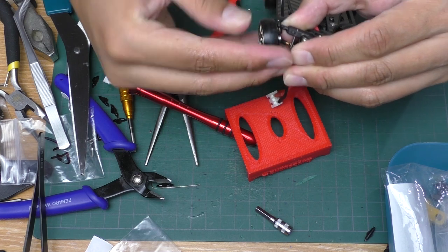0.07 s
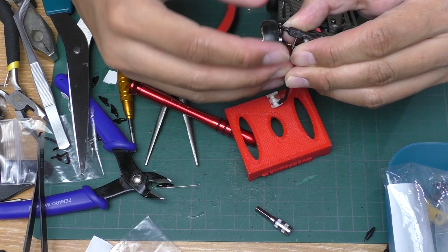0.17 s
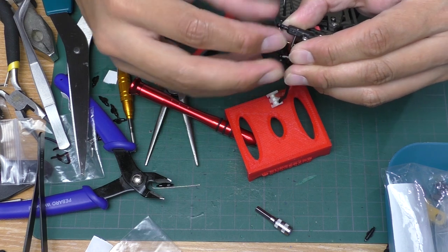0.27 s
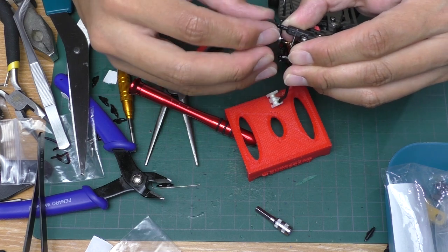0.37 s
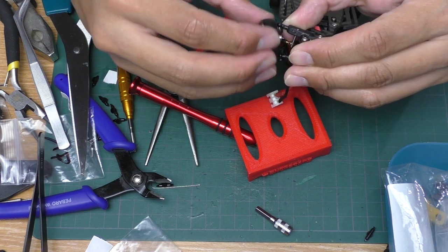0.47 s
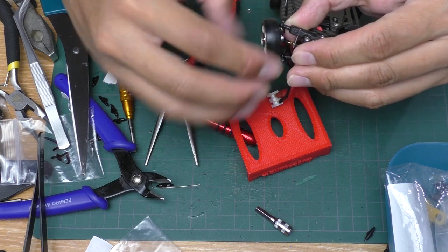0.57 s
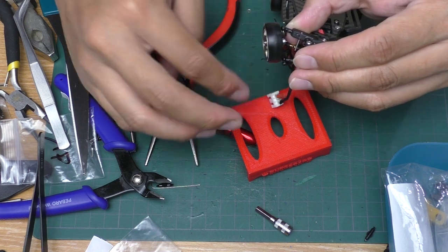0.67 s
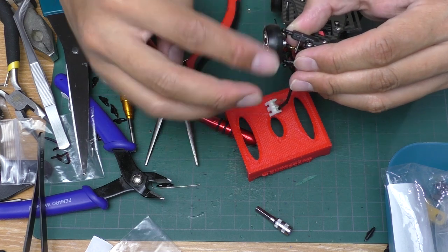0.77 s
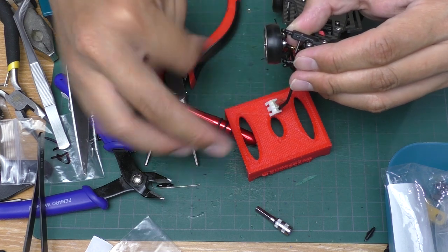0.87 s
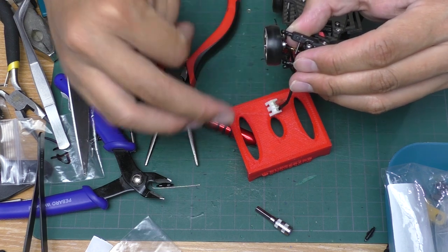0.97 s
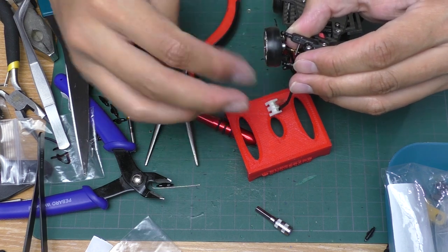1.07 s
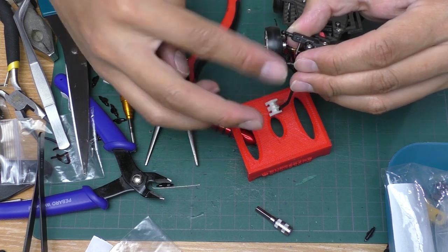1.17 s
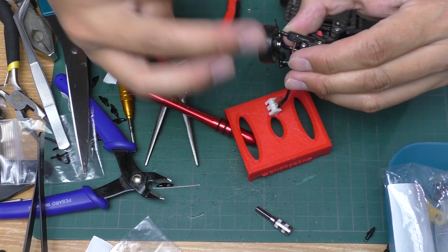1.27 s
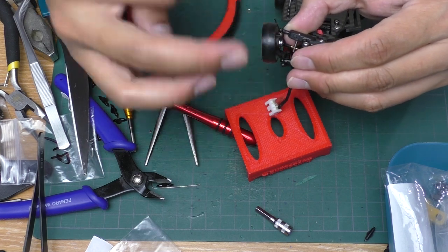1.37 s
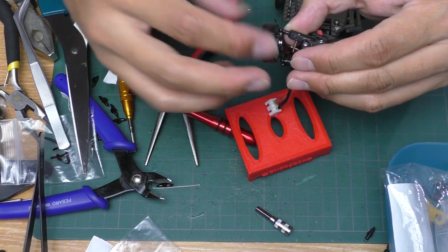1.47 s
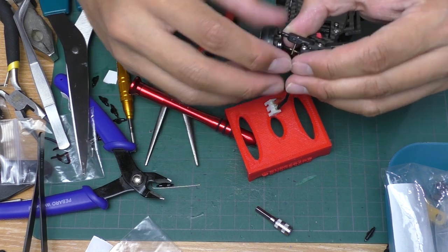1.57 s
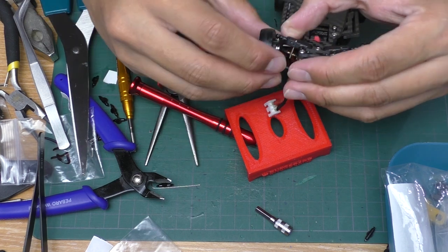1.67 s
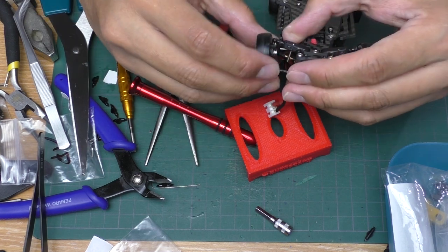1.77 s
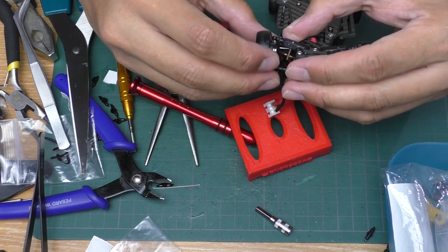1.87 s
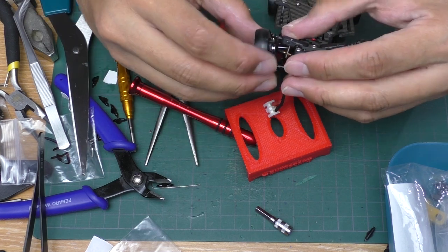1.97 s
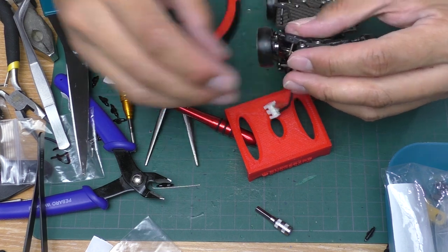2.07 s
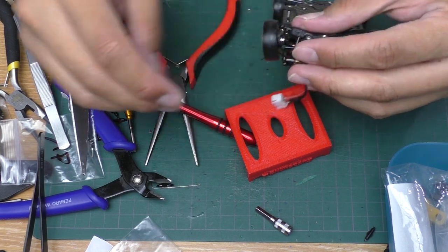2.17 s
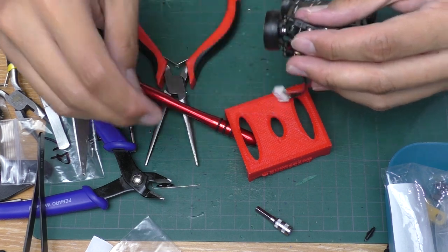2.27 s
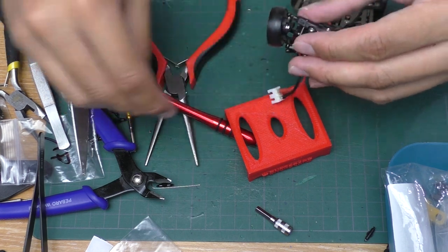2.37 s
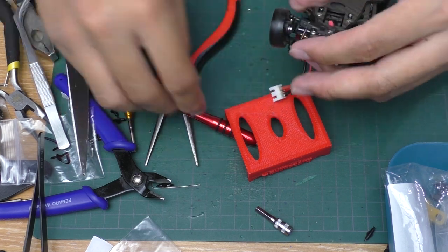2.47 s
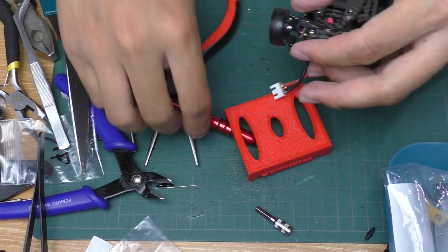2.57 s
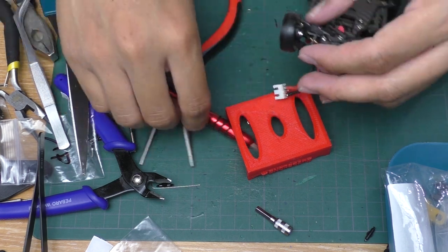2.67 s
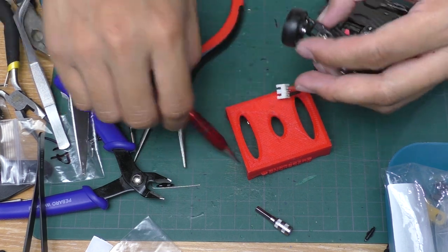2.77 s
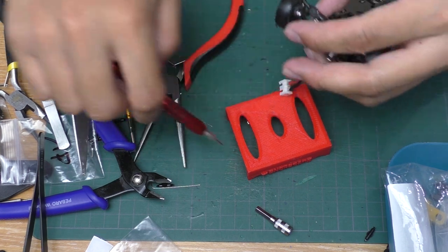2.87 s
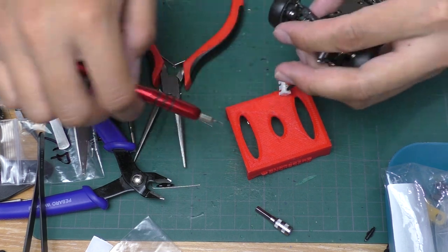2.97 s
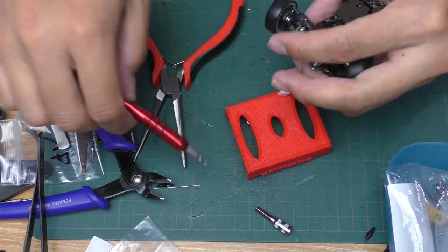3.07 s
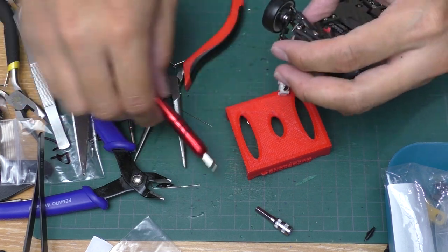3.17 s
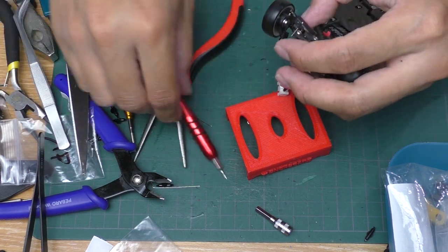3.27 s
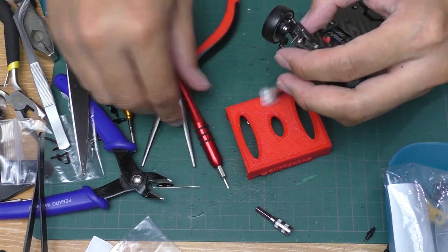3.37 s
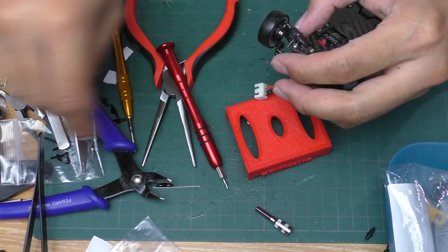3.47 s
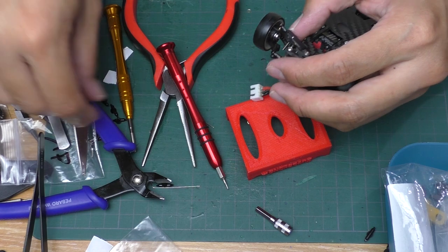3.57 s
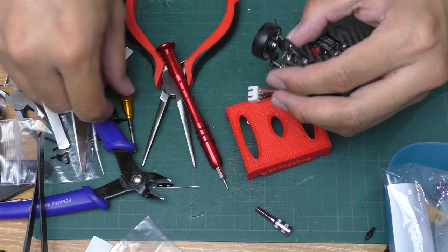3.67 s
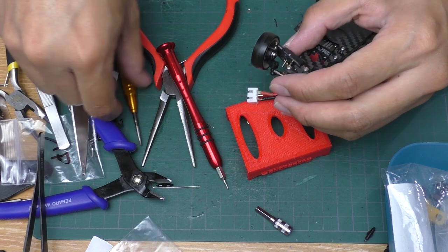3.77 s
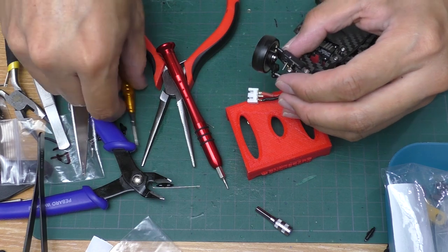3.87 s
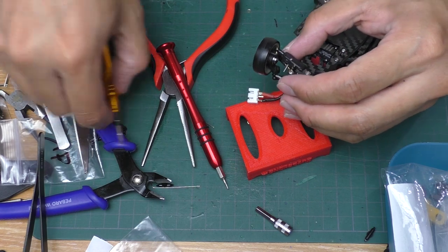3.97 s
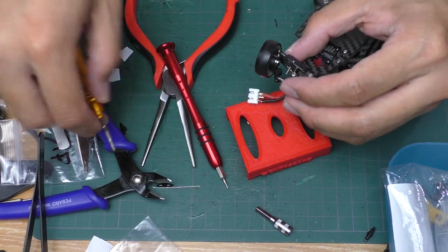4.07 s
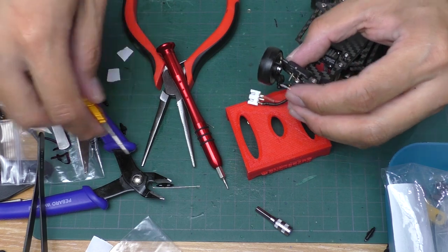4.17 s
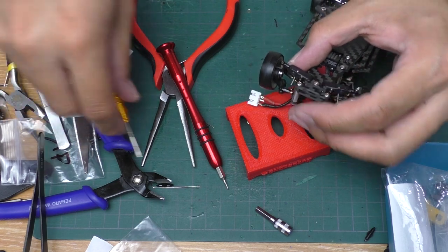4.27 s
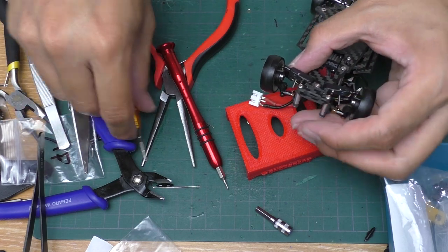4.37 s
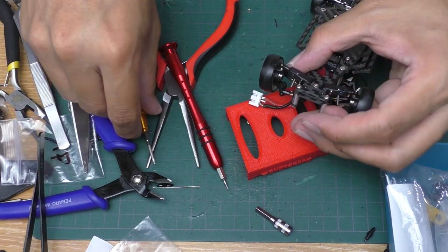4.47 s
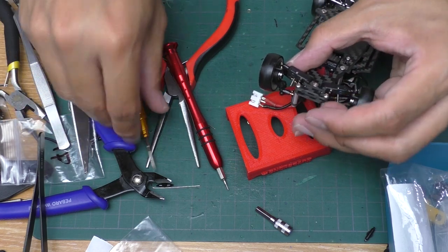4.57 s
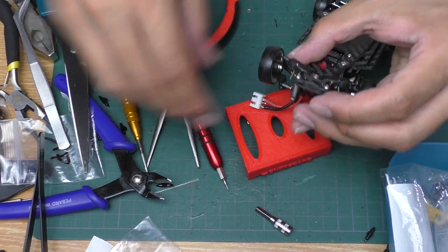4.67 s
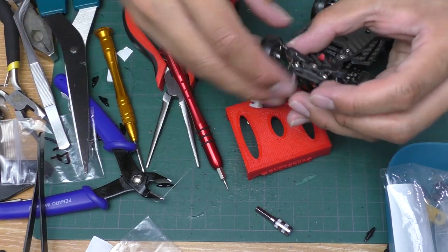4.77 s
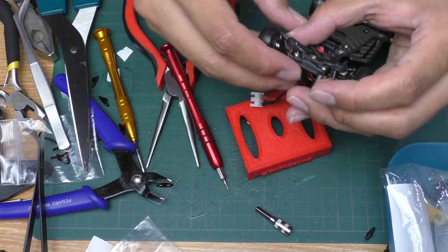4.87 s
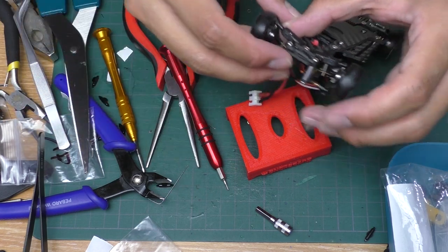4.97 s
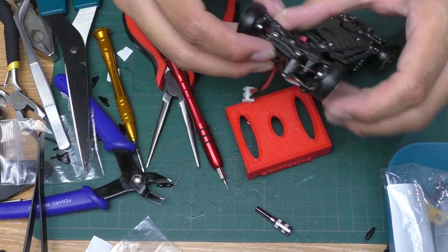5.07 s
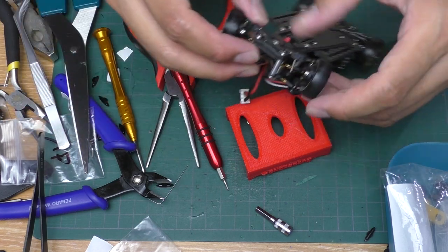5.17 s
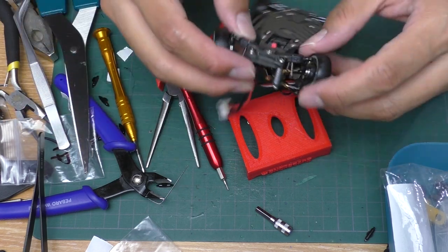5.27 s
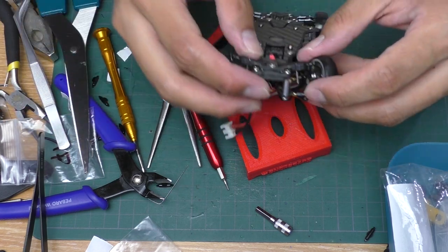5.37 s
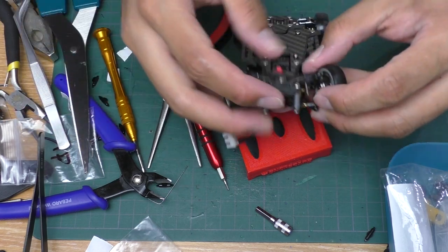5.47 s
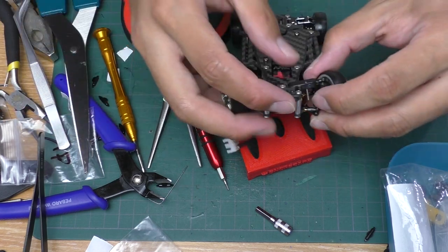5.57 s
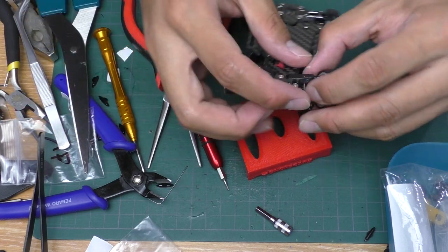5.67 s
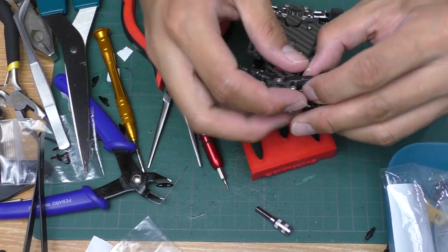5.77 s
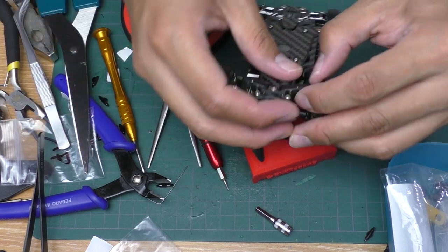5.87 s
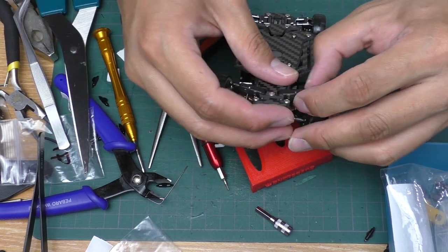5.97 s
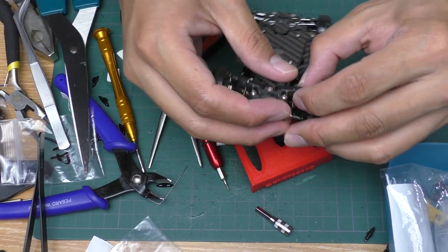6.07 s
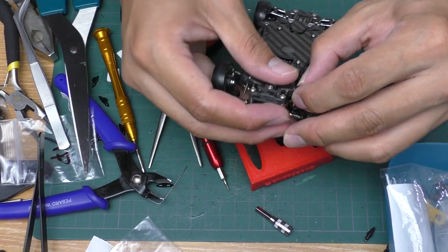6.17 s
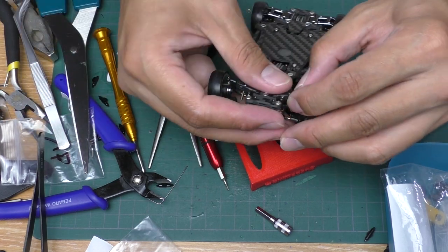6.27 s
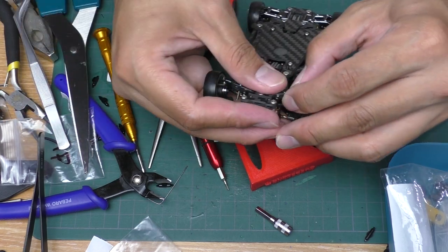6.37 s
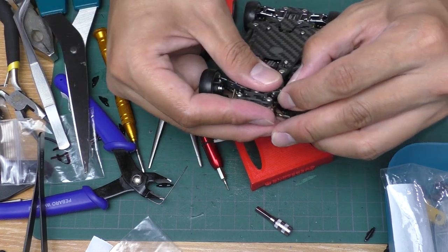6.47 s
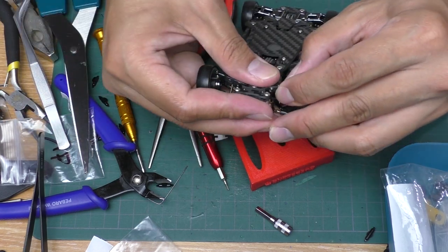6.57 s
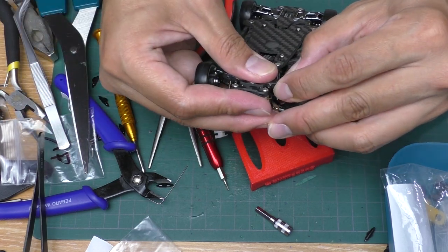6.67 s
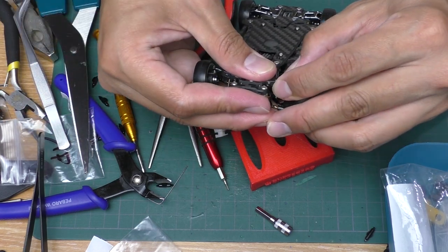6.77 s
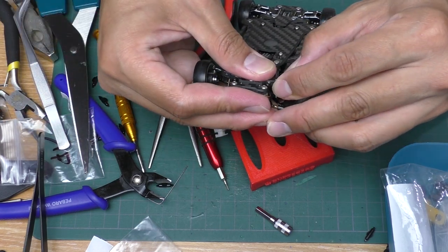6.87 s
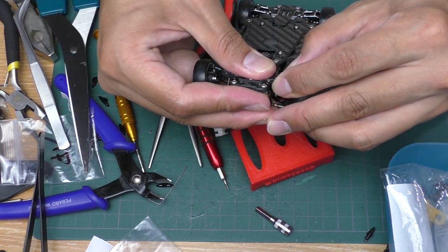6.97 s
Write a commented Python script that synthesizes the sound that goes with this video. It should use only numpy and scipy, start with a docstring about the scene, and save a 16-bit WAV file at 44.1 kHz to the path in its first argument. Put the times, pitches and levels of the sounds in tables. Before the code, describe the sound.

Close stereo pickup of hands handling a small plastic model in a quiet small room. Short joint creaks and dry ticks come first; then a metal tool strikes pliers with a brief ring, and screwdrivers are laid down left of centre with hard bench knocks and high steely clinks. Afterwards come soft finger rubbing, more squeaky creaks and fine snaps, fading to near silence.

```python
"""Plastic model on the workbench

In a quiet small room, hands work on a small plastic model car over a cutting mat on a wooden bench,
close to a stereo pair. Its joints creak as unsteady sine modes, small parts tick as bursts of resonance.
Fingers rub over it: swelling strokes of coloured noise and tiny slips. To the left, two metal screwdrivers
are picked up and laid down: resonant knocks on the bench and decaying clinks against other tools.
Beneath lie the rustle of the hands and the room's background, both coloured noise."""
import sys
import numpy as np
from scipy import signal
from scipy.fft import rfft, irfft
from scipy.io import wavfile
from scipy.ndimage import uniform_filter1d

SR = 44100
rng = np.random.default_rng(int(sys.argv[2]) if len(sys.argv) > 2 else 0)


def unload_wav(signal):
    """Save mono or channel-first audio to the path in sys.argv[1] as 16-bit WAV at rate SR, clipped to [-1, 1]."""
    wavfile.write(
        sys.argv[1],
        SR,
        np.round(np.clip(np.atleast_2d(signal).T, -1, 1) * 32767).astype(np.int16),
    )


N = 310464
TIME = np.arange(N) / SR
HIT_TIME = np.arange(SR // 4) / SR
ATTACK_S = 0.012  # a strike's level is judged over this opening

# Levels in the event tables are relative: trims and filters further on still act on them.
# Colour of the room's background: centre_hz, density_db (dB per Hz)
BACKGROUND_COLOUR = [(15, -33), (25, -4.5), (102, -2), (127, -5.5), (236, -13.5), (285, -3), (384, -32.5),
                     (489, -9), (641, -32), (714, -20), (840, -32), (1020, -15), (4870, -42.5),
                     (14000, -29.5), (16000, -40.5)]
BACKGROUND_DB = -68
# Decay of the room's reverberation: centre_hz, t60_s
ROOM_DECAY = [(100, 0.54), (400, 0.42), (1500, 0.75), (3000, .5), (6000, 0.37), (14000, 0.29)]
# Energy of the reverberation against the direct sound: centre_hz, level_db
ROOM_LEVEL = [(100, 4.5), (300, 0), (700, -2), (1500, -1), (3000, -7.5), (6000, -5.5), (10000, -9.5),
              (15000, -21)]
# Left-right likeness of diffuse sound: centre_hz, likeness (0-1)
STEREO_LIKENESS = [(40, .8), (300, 0.9), (1400, 0.7), (4000, 0.64), (14000, 0.85)]
# Colour of hands shifting: centre_hz, density_db (dB per Hz)
SHIFT_COLOUR = [(50, -10.5), (110, 0.5), (280, 1.5), (480, -10), (700, -18), (1500, -11.5), (2700, -14.5),
                (4500, -27.5), (8000, -33.5), (15000, -29)]
# Low rustle of hands shifting their grip: time_s, level_db
GRIP_LEVEL = [(0.0, -64.5), (1.82, -67), (2.65, -55.5), (2.96, -66), (3.24, -66), (3.45, -60), (4.35, -64),
              (4.67, -62), (4.94, -59.5), (5.92, -58), (6.45, -68), (7.04, -71)]

# A hand bumps softly on the bench: start_s, level_db
HAND_BUMPS = [(1.299, -62.5), (2.403, -51), (2.427, -50.5), (2.721, -52.5), (5.788, -52)]
# Lowest modes of the bench: pitch_hz, width_hz, level_db
BENCH_MODES = [(108, 18, -0.53), (167, 83, -1.1), (264, 59, 0)]
# Metal tools shifting against each other: start_s, level_db
TOOL_NUDGES = [(3.783, -62.5), (5.9, -57.5), (6.126, -71), (6.203, -69)]
# The one blow on the pliers: start_s, level_db
PLIERS_BLOW = (2.7072, -33)
# Ringing of the pliers: pitch_hz, width_hz, level_db
PLIERS_MODES = [(1444, 91, -11.5), (2044, 43, -12), (2605, 52, 0), (2730, 360, -8), (3280, 250, -21),
                (3980, 110, -10.5), (4530, 67, -9.5), (6350, 98, -20), (6980, 37, -21), (10500, 230, -23)]
# The slim steel screwdriver clinks: start_s, first_mode_db, second_mode_db
SHAFT_CLINKS = [(3.845, -48.5, -61), (3.9937, -35.5, -43), (4.458, -36, -45.5), (4.496, -43.5, -57),
                (4.625, -39.5, -25), (4.646, -40, -36.5)]
# Its two bending modes, ringing freely: pitch_hz, t60_s
SHAFT_MODES = [(5297, 0.2), (11715, 0.15)]
# Tools knocking on the bench: start_s, clack_db, tilt_db_per_octave (hardness), thud_db, rebound_s (0: none)
BENCH_KNOCKS = [(1.296, -51.5, -7.5, -60.5, 0), (2.421, -52.5, 4, -52, 0), (2.664, -72, -16, -38, 0.00048),
                (2.684, -51.5, -4.5, -49, 0.000041), (3.2994, -37.5, 0.5, -45, 0),
                (3.423, -45, -5, -48.5, 0.00024), (3.429, -37.5, -4.5, -35.5, 0.019),
                (3.821, -53.5, -9, -51, 0.0042), (3.9958, -45, -1, -52, 0.00017),
                (4.4596, -30, -5.5, -42, 0.031), (4.626, -28.5, 5.5, -36, 0.021)]
# Hard contact between small parts: pitch_hz, width_hz, level_db
CONTACT_MODES = [(4106, 840, -1), (5260, 870, -13), (6500, 3000, -3), (8800, 1200, -1.5), (9700, 2000, -3),
                 (12200, 570, 2), (13500, 4500, 2), (13510, 1300, -4.5)]
# Screwdriver handle: pitch_hz, width_hz, level_db
HANDLE_MODES = [(2870, 470, -2.5), (3063, 150, -7), (3180, 70, -9)]
# Bench board: pitch_hz, width_hz, level_db
BOARD_MODES = [(954, 78, -7.5), (1136, 110, -0.5), (1376, 130, 3), (1520, 150, 5), (1760, 560, 0.5),
               (2114, 460, -0.5)]
# Deep thud of the board: pitch_hz, width_hz, level_db
THUD_MODES = [(110, 38, -13.5), (171, 60, -10.5), (211.6, 58, -4), (271.7, 27, 1.5), (310, 34, -6),
              (410, 28, -1), (473, 22, -3)]
# The crack against the clack at zero tilt, and the octaves of tilt that add to it
CRACK_DB, CRACK_OCTAVES = 3.5, 0.51
# The board against the clack, and how far it follows the thud instead (0-1)
BOARD_DB, BOARD_FOLLOWS = -0.5, 0.1
# What a rebound loses in its clack and in its thud
REBOUND_CLACK_LOSS_DB, REBOUND_THUD_LOSS_DB = 15.5, 9

# Fingers rubbing over plastic and tools: start_s, end_s, level_db
RUB_STROKES = [(2.316, 2.424, -50.5), (2.57, 2.634, -73), (2.717, 2.917, -53.5), (3.781, 3.904, -52),
               (5.048, 5.151, -64.5), (5.234, 5.419, -51), (5.474, 5.626, -58), (5.812, 5.89, -55.5),
               (5.943, 6.026, -43.5), (6.004, 6.298, -59.5)]
# Colour of the rubbing skin: centre_hz, density_db (dB per Hz)
RUB_COLOUR = [(60, -11), (120, -9.5), (300, 3.5), (480, -10.5), (700, -10), (1400, -1.5), (2200, -7),
              (3400, -8), (5200, -27.5), (8000, -42), (11000, -30), (15500, -58)]
# The hollow chassis, stirred by friction: pitch_hz, width_hz, level_db
SHELL_MODES = [(1436, 210, 1.5), (2120, 350, -5.5), (2565, 240, 2.5), (3310, 250, 1.5), (4267, 300, -8),
               (5120, 300, -7.5), (6500, 400, -14.5), (6970, 270, -10.5), (9970, 2300, -6),
               (13100, 3000, -7.5)]
# Small plastic parts snapping: start_s, level_db, tilt_db_per_octave
PLASTIC_TICKS = [(0.009, -50.5, -16), (0.283, -66.5, 0), (0.613, -65, 6), (0.778, -46.5, -9.5),
                 (0.887, -54.5, -1.5), (1.248, -54.5, -1), (1.3027, -45.5, 9), (1.336, -58.5, -18),
                 (1.647, -61.5, 8), (2.1, -64, 8), (2.204, -45.5, -9.5), (2.412, -50.5, -4),
                 (2.761, -64, -6), (2.806, -52.5, -19), (2.841, -61, -2), (3.318, -50, 6),
                 (3.958, -55.5, -5.5), (4.282, -66, -5), (4.953, -48, -7.5), (5.007, -60, -15),
                 (5.368, -48.5, -9.5), (5.419, -50, -5), (5.633, -47.5, -25), (5.79, -43.5, -33),
                 (5.803, -50.5, 20), (6.018, -52.5, -1)]
# Loose parts tick faintly at random, around a level this far from that of the grip
FAINT_TICKS_PER_S, FAINT_TICK_DB = 3.2, -16
# Joints of the chassis creak in runs: start_s, slips (count), lower_db, upper_db
JOINT_CREAKS = [(0.059, 1, -50, -60), (0.121, 1, -45.5, -57), (0.759, 1, -40.5, -54), (0.767, 3, -35, -45),
                (1.599, 1, -50.5, -46.5), (2.169, 2, -39.5, -36), (2.202, 4, -35, -38),
                (2.359, 2, -49, -40), (2.381, 1, -44, -45.5), (2.470, 2, -50, -47.5), (2.624, 1, -56, -45),
                (2.656, 1, -62, -49), (2.826, 2, -56, -42.5), (2.874, 2, -55, -45), (2.916, 1, -50.5, -50),
                (2.948, 1, -61, -50), (3.265, 1, -45, -45.5), (3.428, 1, -52, -30), (5.182, 1, -53, -45.5),
                (5.287, 2, -48, -42.5), (5.309, 4, -42.5, -39.5), (5.370, 2, -42.5, -49),
                (5.442, 2, -46.5, -49), (5.538, 3, -44.5, -47), (5.656, 2, -36, -44.5),
                (5.720, 1, -43.5, -52)]
# Lower resonance of the joints and its companions: pitch_hz, width_hz, level_db
LOWER_MODES = [(2629, 44, 0.5), (2235, 140, -41), (4960, 71, -19.5), (5980, 170, -23.5)]
# Upper resonance of the joints and its companions: pitch_hz, width_hz, level_db
UPPER_MODES = [(3377, 64, 16), (3040, 180, 10), (4370, 250, -29), (6900, 180, -31)]
# Slips come at a nearly steady pace; one of SLIP_DB holds for SLIP_S, twice as long per SLIP_DOUBLES_DB more
SLIP_GAP_S, SLIP_S, SLIP_DB, SLIP_DOUBLES_DB = 0.011, 0.0036, -46, 7.5
# A run's strongest place (share of the run), and the loss half a run away from there
RUN_PEAK, RUN_ARCH_DB = 0.42, 8


def from_db(db):
    """Decibels to gain."""
    return 10 ** (np.asarray(db) / 20)


def rms_one(x, seconds=np.inf):
    """Scale to rms 1, judged over the first so many seconds."""
    opening = x[..., :int(min(seconds * SR, N))]
    return x / np.sqrt(np.mean(opening ** 2) + 1e-20)


def at_hz(points, hz):
    """Read a table on a log-frequency axis."""
    table = np.array(points)
    return np.interp(np.log(hz), np.log(table[:, 0]), table[:, 1])


def add(track, s, sound):
    """Mix a sound into a track at time s."""
    start = max(0, int(s * SR))
    track[start:start + len(sound)] += sound[:N - start]


def flutter(per_s, size):
    """Random wavering about 0: straight lines between normal draws."""
    knots = rng.standard_normal(size // 8 + 2)
    return np.interp(np.arange(size) * per_s / SR, np.arange(len(knots)), knots)


def resonate(x, hz, width):
    """Two-pole resonance; a narrower width in Hz rings longer."""
    r = np.exp(-np.pi * width / SR)
    return signal.lfilter([1, 0, -1], [1, -2 * r * np.cos(2 * np.pi * hz / SR), r * r], x + 1e-18)


def strike(modes, chatter_s, tilt_db=0, spread_db=-1.5):
    """A contact chatters for a moment and sets the modes ringing, each with a strength of its own."""
    t = HIT_TIME[:SR // 8]
    out = 0
    for hz, width, level_db in modes:
        force = rng.standard_normal(len(t)) * np.exp(-t / chatter_s)
        octaves = np.log2(hz / modes[0][0])
        gain = from_db(level_db + tilt_db * octaves + spread_db * rng.standard_normal())
        out = out + gain * rms_one(resonate(force, hz, width), ATTACK_S)
    return rms_one(out, ATTACK_S)


def crackle(per_s, size_db):
    """Tiny random slips, each dealt to one resonance of the chassis; rms 1."""
    at = np.flatnonzero(rng.random(N) < per_s / SR)
    sizes = from_db(size_db * np.minimum(rng.exponential(1, len(at)), 3))
    sizes = sizes * rng.choice([-1, 1], len(at))
    dealt = rng.integers(0, len(SHELL_MODES), len(at))
    out = 0
    for k, (hz, width, level_db) in enumerate(SHELL_MODES):
        slips = np.bincount(at, sizes * (dealt == k), N)
        out = out + from_db(level_db) * rms_one(resonate(slips, hz, width))
    return rms_one(out)


def noise_bands(size):
    """Half-octave bands of equally dense stereo noise, from mid and side: (centre Hz, band)."""
    edges = np.geomspace(22, 17000, 20)
    # two noise pairs take turns, so that neighbouring bands are independent
    white = rng.standard_normal((2, 2, size + SR // 4))
    for k, (low, high) in enumerate(zip(edges, edges[1:])):
        band_filter = signal.butter(2, [low, high], "band", fs=SR, output="sos")
        mid, side = signal.sosfilt(band_filter, white[k % 2])[:, -size:]
        hz = np.sqrt(low * high)
        alike = np.clip(at_hz(STEREO_LIKENESS, hz), 0, 1)
        yield hz, np.sqrt((1 + alike) / 2) * mid + np.sqrt((1 - alike) / 2) * side * [[1], [-1]]


def coloured_noise(spectrum):
    """Stereo noise of a given colour, rms 1."""
    return rms_one(sum(from_db(at_hz(spectrum, hz)) * band for hz, band in noise_bands(N)))


def panned(x, left_db, lead_s=0, shadow_hz=1200):
    """Place a mono sound between the microphones: right delayed by lead_s, left_db reached in the treble."""
    hz, spectrum = np.fft.rfftfreq(N, 1 / SR), rfft(x)
    gain = from_db(left_db / 2 * hz / (hz + shadow_hz))
    delay = np.exp(-2j * np.pi * hz * lead_s)
    return irfft([spectrum * gain, spectrum / gain * delay], N)


def background():
    """The quiet room's steady noise."""
    return from_db(BACKGROUND_DB) * coloured_noise(BACKGROUND_COLOUR)


def room(x, build_s=0.0049):
    """Diffuse reflections build up within milliseconds and die soonest in the highest treble."""
    t = TIME[:SR * 3 // 4]
    response = 0
    for hz, band in noise_bands(len(t)):
        decay = from_db(-60 * t / at_hz(ROOM_DECAY, hz))
        envelope = (1 - np.exp(-(t / build_s) ** 2)) * decay
        energy_one = envelope / np.sqrt(np.sum(envelope ** 2))
        response = response + from_db(at_hz(ROOM_LEVEL, hz)) * band * energy_one
    return signal.fftconvolve(x, response, axes=1)[:, :N]


def clutter(x, scatter_db=-14, fade_s=0.002):
    """Hands and things on the bench scatter the sound at once, differently towards each microphone."""
    t = HIT_TIME[:SR // 100]
    echoes = rng.standard_normal((2, len(t))) * t * np.exp(-t / fade_s)
    echoes /= np.sqrt(np.sum(echoes ** 2, axis=1))[:, None]
    return x + from_db(scatter_db) * signal.oaconvolve(x, echoes, axes=1)[:, :N]


def hollowed(x, dip_hz=720, width_hz=330, depth=0.35):
    """The lower midrange is hollow, between the bench's thud and its clack."""
    return x - depth * signal.lfilter(*signal.iirpeak(dip_hz, dip_hz / width_hz, fs=SR), x)


def hands(waver_db=1.57, rustle_db=1.0):
    """Soft dull rustle of hands holding the model: noise that wavers around the grip's level."""
    level_db = np.interp(TIME, *np.transpose(GRIP_LEVEL)) + rustle_db + waver_db * flutter(30, N)
    return from_db(level_db) * coloured_noise(SHIFT_COLOUR)


def bumps():
    """Soft, slow blows of a hand reach only the bench's lowest modes."""
    out = np.zeros(N)
    for s, level_db in HAND_BUMPS:
        add(out, s, from_db(level_db) * strike(BENCH_MODES, chatter_s=0.0017))
    return out


def nudges(board_db=-5):
    """Light touches between tools stir a handle, with a little board and contact."""
    out = np.zeros(N)
    for s, level_db in TOOL_NUDGES:
        handle = strike(HANDLE_MODES, chatter_s=0.0047)
        board = from_db(board_db) * strike(BOARD_MODES + CONTACT_MODES, chatter_s=0.003)
        add(out, s, from_db(level_db) * (handle + board))
    return out


def pliers(thud_db=-11):
    """A screwdriver hits the pliers, which ring and rock on the mat."""
    out = np.zeros(N)
    s, level_db = PLIERS_BLOW
    ring = strike(PLIERS_MODES, chatter_s=0.0042)
    rock = from_db(thud_db) * strike(THUD_MODES, chatter_s=0.012)
    add(out, s, from_db(level_db) * (ring + rock))
    return out


def clinks(damped_t60=0.058, free_share=0.12, level_db=4.0):
    """The shaft rings hard, is mostly damped by the hand or mat, and sings on faintly."""
    out = np.zeros(N)
    damped = (1 - free_share) * from_db(-60 * HIT_TIME / damped_t60)
    for s, *mode_db in SHAFT_CLINKS:
        for (hz, t60), strength_db in zip(SHAFT_MODES, mode_db):
            envelope = damped + free_share * from_db(-60 * HIT_TIME / t60)
            tone = np.sin(2 * np.pi * hz * HIT_TIME)
            add(out, s, from_db(strength_db + level_db) * envelope * tone)
    return out


def blows():
    """Every knock and its weaker rebound: (start_s, clack_db, tilt_db_per_octave, thud_db)."""
    for s, clack_db, tilt_db, thud_db, rebound_s in BENCH_KNOCKS:
        yield s, clack_db, tilt_db, thud_db
        if rebound_s > 0:
            yield s + rebound_s, clack_db - REBOUND_CLACK_LOSS_DB, tilt_db, thud_db - REBOUND_THUD_LOSS_DB


def knocks(board_lag_s=0.00037, thud_lag_s=0.00056, handle_db=-1, board_tilt_share=0.4):
    """Contact and handle sound first, then board and deep thud; a harder contact is louder and brighter."""
    out = np.zeros(N)
    for s, clack_db, tilt_db, thud_db in blows():
        crack_db = clack_db + CRACK_DB + CRACK_OCTAVES * tilt_db
        board_db = clack_db + BOARD_DB + BOARD_FOLLOWS * (thud_db - clack_db)
        crack = strike(CONTACT_MODES, chatter_s=0.0024, tilt_db=tilt_db)
        handle = strike(HANDLE_MODES, chatter_s=0.0029)
        board = strike(BOARD_MODES, chatter_s=0.0056, tilt_db=board_tilt_share * tilt_db)
        thud = strike(THUD_MODES, chatter_s=0.0025)
        add(out, s, from_db(crack_db) * crack)
        add(out, s, from_db(clack_db + handle_db) * handle)
        add(out, s + board_lag_s, from_db(board_db) * board)
        add(out, s + thud_lag_s, from_db(thud_db) * thud)
    return out


def rubbing(grain_db=4.0, grains_per_s=600, catch_db=-0.1, catches_per_s=70, skin_db=-3, shell_db=-3.5):
    """Each stroke swells and fades; the skin catches and lets go within it and stirs the hollow chassis."""
    pressure = np.zeros(N)
    for start, end, level_db in RUB_STROKES:
        samples = max(end - start, 0.01) * SR
        progress = np.arange(int(samples)) / samples
        add(pressure, start, from_db(level_db) * np.sin(np.pi * progress))
    grain = from_db(grain_db * flutter(grains_per_s, N))
    skin = from_db(skin_db) * rms_one(coloured_noise(RUB_COLOUR) * grain)
    shell = from_db(shell_db) * crackle(per_s=1100, size_db=3.5)
    catching = rms_one(from_db(catch_db * flutter(catches_per_s, N)))
    return catching * pressure * (skin + shell)


def faint_ticks(spread_db=7.5, tilt_spread_db=5):
    """Chance ticks of loose parts, stronger while the hands are busy: (start_s, level_db, tilt_db_per_octave)."""
    slots = np.arange(int(FAINT_TICKS_PER_S * N / SR))
    s = (slots + rng.random(len(slots))) / FAINT_TICKS_PER_S
    size, colour = rng.standard_normal((len(slots), 2)).T
    level_db = np.interp(s, *np.transpose(GRIP_LEVEL)) + FAINT_TICK_DB + spread_db * size
    return list(zip(s, level_db, tilt_spread_db * colour))


def ticks(body_db=-11, bump_db=-12):
    """Short bright snaps, with a little of the body that carries them."""
    out = np.zeros(N)
    for s, level_db, tilt_db in PLASTIC_TICKS + faint_ticks():
        snap = strike(CONTACT_MODES, chatter_s=0.0031, tilt_db=tilt_db)
        body = from_db(body_db) * strike(BOARD_MODES + HANDLE_MODES, chatter_s=0.0013)
        bump = from_db(bump_db) * strike(THUD_MODES, chatter_s=0.00067)
        add(out, s, from_db(level_db) * (snap + body + bump))
    return out


def slip_run(count, level_db, rise_s, release_s, jitter=0.079):
    """Envelope of a run of slips: each rises, holds and dies; the run is strongest near its middle."""
    hold_s = SLIP_S * 2 ** ((level_db - SLIP_DB) / SLIP_DOUBLES_DB)
    envelope = np.zeros(len(HIT_TIME))
    for k in range(count):
        # the first slip is on time, the others stray a little
        slip_s = SLIP_GAP_S * (k + jitter * rng.standard_normal() * (k > 0))
        t = np.maximum(HIT_TIME - slip_s, 0)
        off_centre = 2 * ((k + 0.5) / count - RUN_PEAK)
        slip = (1 - np.exp(-t / rise_s)) * np.exp(-np.maximum(t - hold_s, 0) / release_s)
        envelope = np.maximum(envelope, from_db(-RUN_ARCH_DB * off_centre ** 2) * slip)
    return envelope


def squeal(modes, rough):
    """Friction keeps the modes sounding; uneven slips shake their pitch and strength."""
    size, out = len(HIT_TIME), 0
    for hz, width, level_db in modes:
        # a random walk of phase spreads each tone over its width
        phase = np.cumsum(rng.standard_normal(size)) * np.sqrt(2 * np.pi * width / SR)
        phase = uniform_filter1d(phase, size=24)
        out = out + from_db(level_db) * np.sin(2 * np.pi * hz * HIT_TIME + phase)
    return rms_one(out * (1 + rough * flutter(670, size)))


def creaks(rise_s=0.0004, release_s=0.0034, rough=0.41, level_db=-1.5, grit_db=-13, detune=0.0087):
    """A joint squeals and grates while it slips, and dies quickly once it holds; the grip shifts its pitch."""
    out, friction = np.zeros(N), np.zeros(N)
    for s, slips, lower_db, upper_db in JOINT_CREAKS:
        envelope = slip_run(round(slips), max(lower_db, upper_db), rise_s, release_s)
        for modes, mode_db in ((LOWER_MODES, lower_db), (UPPER_MODES, upper_db)):
            gripped = np.array(modes) * [1 + detune * rng.uniform(-1.1, 1), 1, 1]
            add(out, s, envelope * from_db(mode_db) * squeal(gripped, rough))
        add(friction, s, envelope * np.hypot(from_db(lower_db), from_db(upper_db)))
    grit = friction * from_db(grit_db) * crackle(per_s=9000, size_db=-2.5)
    return from_db(level_db) * (out + grit)


def scene(joint_room_db=-4, tick_room_db=-1):
    """The model is in the middle, close to the microphones; the tools lie left and stir the room more."""
    tools = panned(knocks() + clinks() + nudges(), left_db=3.0, lead_s=-0.000005)
    bench = tools + panned(pliers() + bumps(), left_db=0.5)
    plastic = panned(ticks(), left_db=0.0, lead_s=0.000003) + rubbing()
    joints = panned(creaks(), left_db=0.9, lead_s=-0.0000071)
    reflections = room(from_db(joint_room_db) * joints + from_db(tick_room_db) * plastic + bench)
    handling = hollowed(clutter(joints + plastic + bench) + reflections)
    return background() + hands() + handling


def record(dry, low_cut_hz=38, top_cut_hz=16000):
    """The microphone loses the deepest bass; the top is cut steeply."""
    low_cut = signal.butter(3, low_cut_hz, "high", fs=SR, output="sos")
    top_cut = signal.ellip(10, 0.2, 80, top_cut_hz, fs=SR, output="sos")
    return signal.sosfilt(top_cut, signal.sosfilt(low_cut, dry))


dry = scene()
out = record(dry)
unload_wav(out)
```